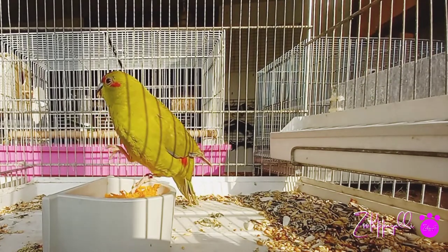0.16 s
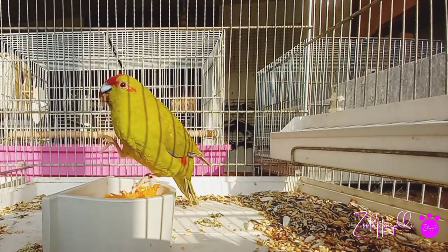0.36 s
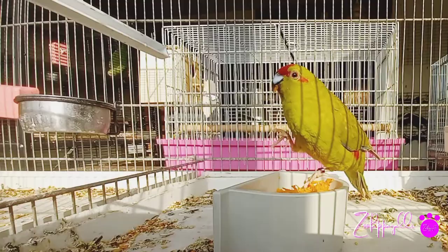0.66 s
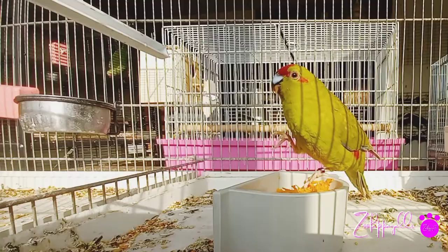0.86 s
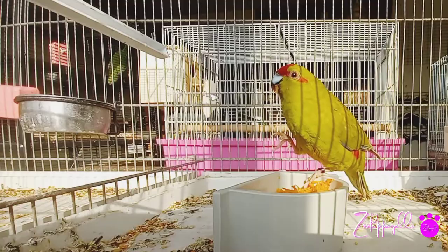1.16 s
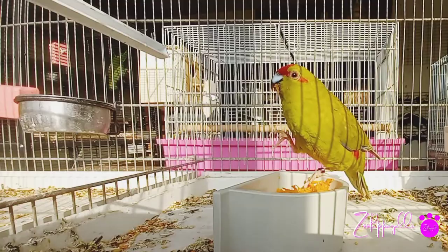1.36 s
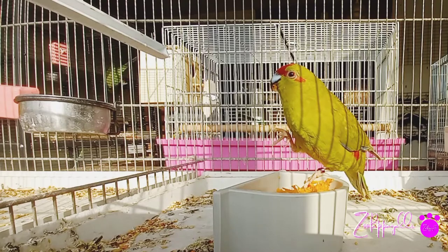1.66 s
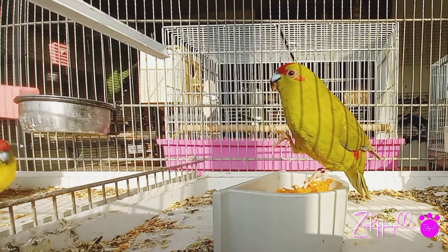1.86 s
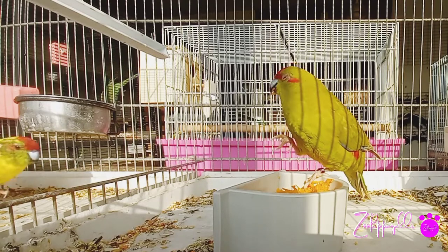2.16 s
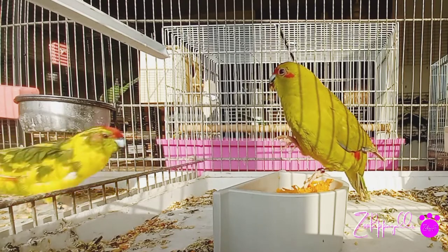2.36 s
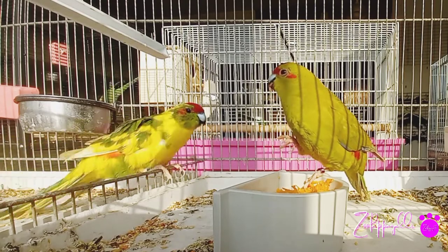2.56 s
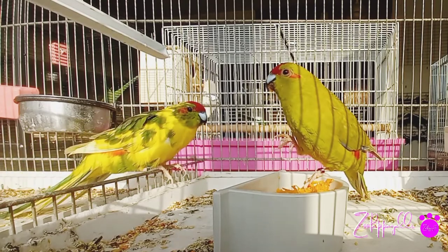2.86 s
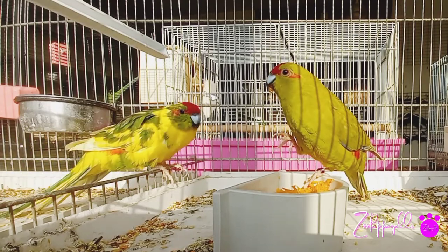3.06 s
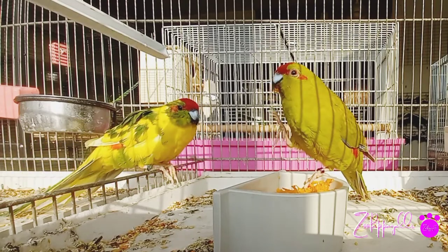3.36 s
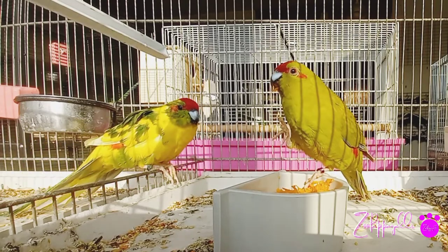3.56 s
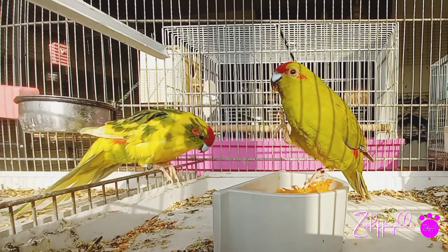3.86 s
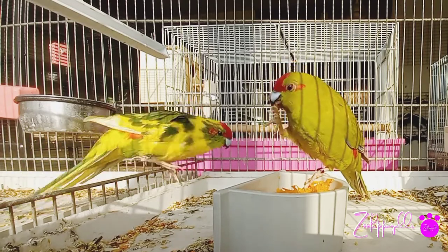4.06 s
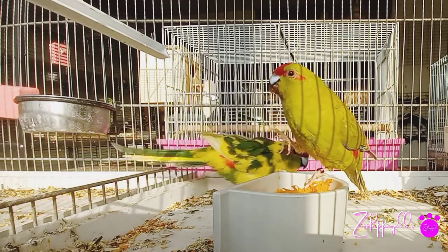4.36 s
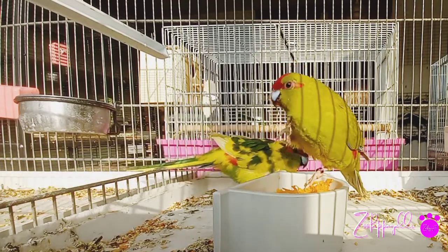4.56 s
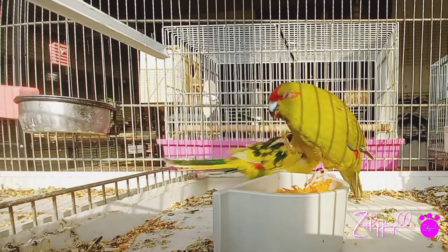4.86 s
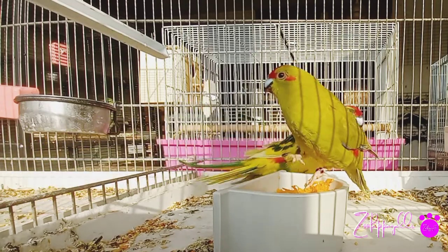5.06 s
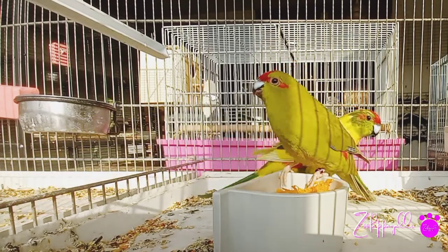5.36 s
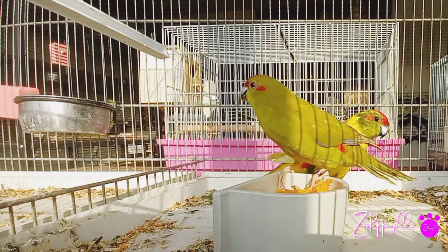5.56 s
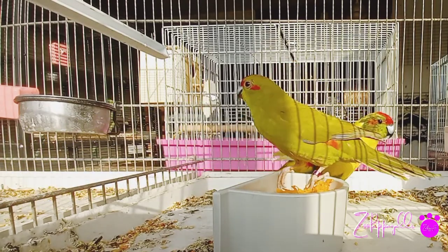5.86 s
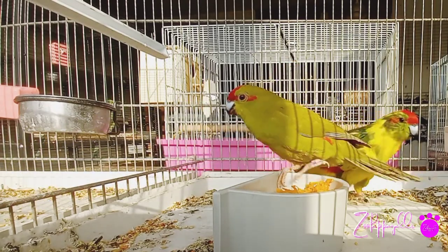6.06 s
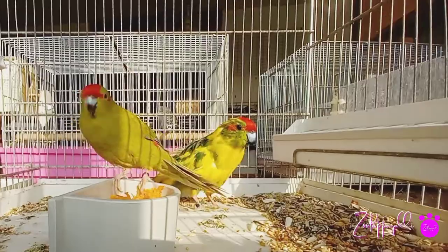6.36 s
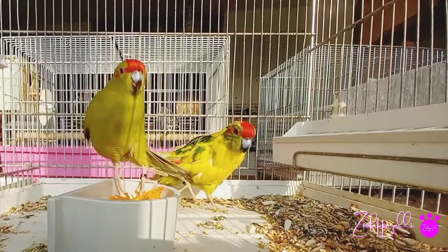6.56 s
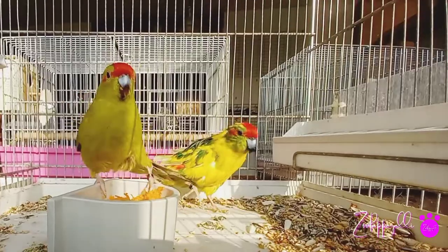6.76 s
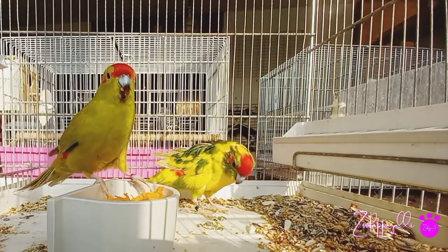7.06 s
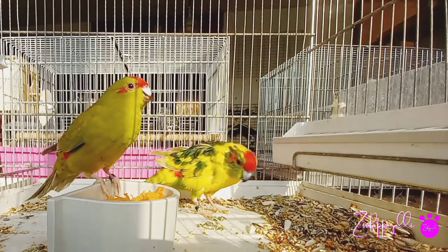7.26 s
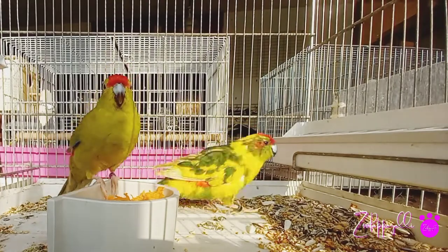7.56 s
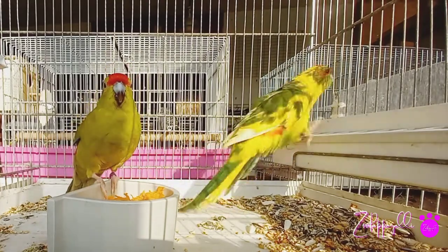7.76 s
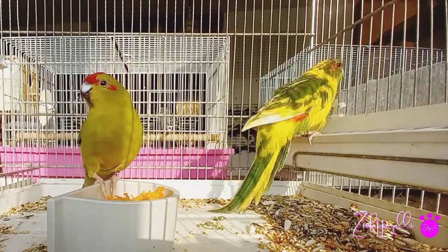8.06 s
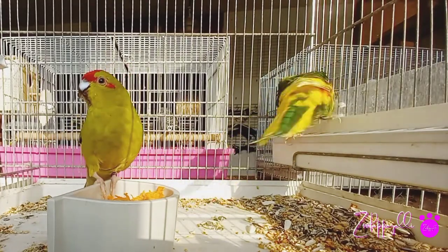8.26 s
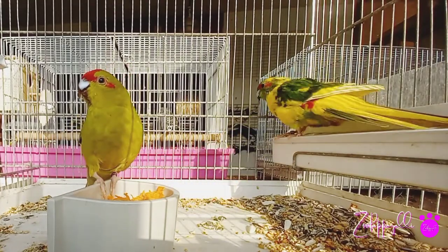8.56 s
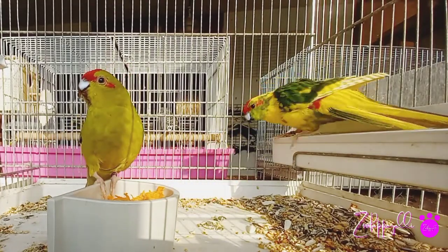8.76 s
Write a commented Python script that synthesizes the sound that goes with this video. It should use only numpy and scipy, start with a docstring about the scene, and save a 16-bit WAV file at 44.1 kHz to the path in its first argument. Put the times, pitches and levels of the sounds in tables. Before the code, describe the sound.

Two small parakeets feed in a wire cage, close by in a small, hard room with faint air noise and a low rumble. Other birds rasp and mutter faintly further off at first. From about 1.5 to 2.5 seconds, beaks and claws click on seed and wire, the plastic dish knocks, and there is a soft nasal call. Just after 3 seconds one bird whistles two quick, high, rising chirps. A short rasp at 4 seconds is followed by sharp knocks on the dish. Single pecks and steps continue until 7 seconds, with light rustles of feathers and husks and an occasional soft boom from the floor tray. Around 7.5 seconds another nasal call leads into the loudest flurry of clicks and a low thump. Quick taps on perch and wire follow just after 8 seconds, thinning to light ticks by 9.

```python
"""Parakeets at a food dish.

Two small birds feed in a wire cage, close to a stereo microphone in a small hard room. Beaks and claws
click on dish, seed and wire; the plastic dish knocks, the floor tray booms, feathers and husks rustle.
One bird whistles two rising chirps and soft nasal calls go with the hops. Other birds rasp and mutter
further off, over room air, a low rumble and a faint passing hum."""
import sys
import numpy as np
from scipy import signal
from scipy.fft import rfft, irfft
from scipy.io import wavfile
from scipy.ndimage import uniform_filter1d

SR = 44100
rng = np.random.default_rng(int(sys.argv[2]) if len(sys.argv) > 2 else 0)


def to_wav(s):
    """Save 16-bit WAV."""
    ch = np.atleast_2d(s).T  # columns
    pcm = np.round(np.clip(ch, -1, 1) * 32767)  # PCM
    wavfile.write(sys.argv[1], SR, pcm.astype(np.int16))


N = 392490

# Lone beak and claw clicks: (time [s], level [dB], body [dB], edge [dB])
CLICKS = [(0.941, -61.5, 14, 13), (0.986, -45.5, -31, 6), (1.022, -46.5, -17, -3), (1.232, -48, -22, -12),
          (1.647, -32.5, -21, 3.5), (1.823, -44.5, 15, 9), (2.168, -27, -9, -10), (2.176, -26, -1, -2),
          (2.288, -29.5, 2, -9), (2.345, -31.5, -6, -6), (2.374, -39.5, 0.5, -12), (2.4307, -29, -32, 4.5),
          (2.536, -41.5, -9, -9), (4.632, -24.5, -8.5, -10), (5.2437, -26.5, -8.5, -33),
          (5.332, -32, -14.5, -24.5), (6.359, -31.5, -11.5, -6), (6.579, -42.5, -2.5, -1),
          (6.665, -51, 5.5, -1), (6.699, -41.5, -15, -15), (7.1062, -33.5, -23.5, 8),
          (7.300, -49.5, -16.5, -17), (7.4399, -27, -20.5, 7.5), (7.485, -31, -8, -2),
          (7.517, -28.5, 2, -14.5), (7.626, -28, -5, -3), (7.6405, -29, -1.5, 9), (7.705, -27.5, -3.5, 5.5),
          (7.71, -30.5, 8.5, -4), (7.7258, -10.5, -7, 0.5), (7.7293, -16, -6.5, -7),
          (7.7519, -15.5, -15.5, -26), (7.868, -37, 8, -0.5), (8.1576, -35, -20, 1), (8.286, -46.5, 3, -3),
          (8.6075, -41.5, -3, 2), (8.689, -38, -8, -1), (8.768, -41.5, -28, -4), (8.8304, -35, -21, 2)]
# Pecks and footfalls that touch, land, then knock the dish:
# (time [s], touch [dB], gap to landing [ms], landing [dB], edge [dB], knock [dB], knock pitch [Hz])
BLOWS = [(1.7902, -27, 3.53, -24, -6, -11, 1227), (2.2978, -24, 3.1, -22.5, -9.5, -29.5, 512),
         (4.146, -28, 8.8, -23.5, -6.5, -14.5, 1178), (4.1845, -14.5, 5.5, -16.5, -10, -13.5, 720),
         (4.8051, -22, 7.9, -20.5, -5.5, -33.5, 740), (5.416, -22.5, 6.1, -19.5, -2, -28.5, 680),
         (5.9591, -20, 3.9, -39, -6.5, -23, 692), (6.123, -33.5, 11.6, -23, -4, -29.5, 740),
         (6.971, -27, 10.2, -33, -7.5, -32, 740)]
def clicks(touch_body_db=-6, landing_body_db=-11, max_ring_s=.0204, ring_halving_db=27.5):
    """Each contact is a chattering crack plus modes in three registers: dish wall, husk, claw tip."""
    contacts = list(CLICKS)
    for s, touch_db, gap_ms, landing_db, edge_db, _, _ in BLOWS:
        contacts.append((s, touch_db, touch_body_db, edge_db))
        contacts.append((s + gap_ms / 1000, landing_db, landing_body_db, edge_db))
    out, t = np.zeros((2, N)), np.arange(int(SR * .06)) / SR
    attack = 1 - np.exp(-t / .0005)
    for s, db, body_db, edge_db in contacts:
        ring_s = max_ring_s * 2 ** (min(body_db, 0) / ring_halving_db)
        fade = 1000. ** (-t / ring_s) * undb(3.5 * walk(len(t), 1200))
        registers = (540, 2000, body_db - 4), (2134, 7200, -3), (7300, 16500, edge_db - 2.5)
        click = 0
        for lo_hz, hi_hz, gain_db in registers:
            crack = 2.27 * unit(band(spread(len(t), 1) * fade, lo_hz, hi_hz))
            click = click + undb(gain_db) * unit(attack * (crack + modes(t, lo_hz, hi_hz, ring_s)))
        add(out, s, place(click * undb(db) / np.sqrt(12), s))
    return out


# Taps on tray, perch and wires: (time [s], level [dB], pitch [Hz], ring [ms])
KNOCKS = [(1.803, -34.5, 506, 37), (4.195, -23.5, 533, 25), (6.567, -44.5, 1290, 34), (6.79, -54, 1306, 42),
          (6.969, -39, 1194, 11), (7.107, -39.5, 1243, 15), (7.441, -38.5, 1247, 14),
          (7.654, -33.5, 896, 26), (7.867, -37, 823, 9.4), (8.1285, -25, 1255, 5), (8.156, -30, 5470, 13),
          (8.185, -22.5, 1550, 4.5), (8.192, -19.5, 1640, 3.1), (8.208, -26, 1560, 3.8),
          (8.2855, -39, 5170, 15), (8.609, -36, 5170, 13), (8.609, -56.5, 2010, 49), (8.676, -50, 1940, 23),
          (8.831, -56, 1920, 38)]
def knocks(wall_lag_ms=4.5, wall_ring_ms=11.2):
    """A soft push of foot or beak rings one heavily damped mode and two weaker ones."""
    dish_knocks = [(s + (gap_ms + wall_lag_ms) / 1000, db, hz, wall_ring_ms)
                   for s, _, gap_ms, _, _, db, hz in BLOWS]
    out, t = np.zeros((2, N)), np.arange(SR // 8) / SR
    for s, db, hz, ring_ms in list(KNOCKS) + dish_knocks:
        age = t * 1000 / ring_ms
        envelope = 1000. ** -age * (1 - np.exp(-age / .099)) ** 2
        phase = 2 * np.pi * hz * t
        tone = np.sin(phase) + .12 * np.sin(1.9 * phase) + .2 * np.sin(.87 * phase)
        add(out, s, place(tone * envelope / envelope.max() * undb(db + 3.5), s))
    return out


# Tray and wire resonances: (centre [Hz], T60 [s], level [dB])
CAGE_MODES = [(491, 0.33, -14), (573, 0.036, -14.5), (1235, 0.29, -14), (1296, 0.23, -13),
              (2270, 0.15, -9.5), (2630, 0.6, -16)]
def cage(x, gain_db=0):
    """Contacts pass into the tray and wires, which rattle on in narrow bands."""
    t = np.arange(SR // 2) / SR
    response = 0
    for hz, t60_s, db in CAGE_MODES:
        ring = band(rng.standard_normal(len(t)), .91 * hz, 1.09 * hz, order=2) * 1000. ** (-t / t60_s)
        response = response + undb(db + gain_db) * ring / np.sqrt(np.sum(ring ** 2) * 10)
    return x + signal.fftconvolve(x, response[None], axes=1)[:, :N]


# Rising chirps: (time [s], stretch [ratio], level [dB])
CHIRPS = [(3.074, 1.0, -24.5), (3.266, .93, -24.5)]
def chirps(base_s=.09, sweep_hz=(4950, 7200), swell_db=9.5, pan_db=-2.5):
    """The near bird's whistle rises evenly and swells, rougher and buzzier as it climbs."""
    out = np.zeros((2, N))
    for s, stretch, db in CHIRPS:
        n = int(base_s * stretch * SR)
        t = np.arange(n) / SR / stretch
        progress = t / base_s
        hz = np.interp(progress, [0, 1], sweep_hz)
        ramp = np.minimum(t / .04, (base_s - t) / .0074)
        level_db = db + swell_db * (np.minimum(ramp, 1) - 1)
        tone = whistle(hz, rough=.03 * np.sqrt(progress), octave_db=-14.5,
                       buzz_db=-28.5 + 15 * progress, buzz_hz=2633, hiss_db=-22)
        envelope = signal.windows.tukey(n, .2) * undb(level_db + 1.9 * walk(n, 320))
        add(out, s, place(tone * envelope, s))
    return out * undb(np.array([[pan_db], [-pan_db]]) / 2)


# Feathers and feet over husks: (peak time [s], length [s], level [dB], body [dB], edge [dB])
RUSTLES = [(1.49, .2, -54, -10.5, -11.5), (1.60, 0.13, -49, -8, -9.5), (1.831, 0.073, -44, 10, -15.5),
           (2.343, 0.068, -44.5, 1, -9), (2.46, 0.068, -49.5, 0.5, -11.5), (3.683, 0.14, -57.5, -11, -16),
           (3.861, 0.16, -59.5, -19, -10), (4.446, 0.12, -54.5, -7, -28), (4.617, 0.024, -37.5, -6, -16),
           (4.852, 0.12, -51, 2.5, -16), (5.134, .18, -61, 3.5, -24), (5.333, 0.036, -45.5, 0.5, -12),
           (5.631, 0.07, -65.5, -5, -10), (5.865, 0.059, -57.5, -3.5, -23), (5.929, 0.041, -44, -3.5, -16),
           (6.376, 0.044, -48.5, 5.5, -12), (6.79, .11, -64, 0, -2.5), (7.377, 0.027, -55.5, -3, -20),
           (7.524, 0.096, -46.5, 6, -9), (7.623, 0.039, -37, 5.5, -8), (7.77, .06, -52.5, 14, -18),
           (8.167, .032, -43, -9.5, -14), (8.695, 0.17, -67.5, -4, -6)]
def rustles(rise_share=.36, base_hz=4520, body_db_per_octave=69, width_hz=1000):
    """Dense husk and barb ticks swell and die, ringing in three bands about an octave apart."""
    out = np.zeros((2, N))
    for s, length_s, db, body_db, edge_db in RUSTLES:
        rise_s, fall_s = length_s * rise_share, length_s * (1 - rise_share)
        hz = base_hz * 2 ** (-body_db / body_db_per_octave)
        t = np.arange(-min(2 * rise_s, s), 2.7 * fall_s, 1 / SR)
        swell = np.exp(-(t / np.where(t < 0, rise_s, fall_s)) ** 2)
        ticks = spread(len(t), 4.1) * undb(2 * walk(len(t), 1400) + 3.6 * walk(len(t), 90))
        registers = (490, 2380, body_db), (2760, 7800, 5), (7300, 17800, edge_db + 15)
        brush = sum(undb(gain_db) * unit(band(ticks, lo, hi)) for lo, hi, gain_db in registers)
        for ratio, gain_db in (.54, -23), (1, -4.5), (2, edge_db - 4):
            ring = resonance(ticks, ratio * hz, ratio * width_hz)
            ring = resonance(ring, ratio * hz, 2 * ratio * width_hz)
            brush = brush + undb(gain_db) * unit(ring)
        add(out, s + t[0], place(brush * swell * undb(db), s))
    return out


# Landings and steps on the tray: (time [s], level [dB])
BOOMS = [(1.83, -37.5), (6.381, -38), (6.429, -44.5), (7.733, -39)]
def booms(hz=78.8, attack_s=.0067, t60_s=.53):
    """The wide floor tray swings in its lowest mode, with one weak overtone."""
    out, t = np.zeros(N), np.arange(SR) / SR
    envelope = (1 - np.exp(-t / attack_s)) * 1000. ** (-t / t60_s)
    for s, db in BOOMS:
        tone = np.sin(2 * np.pi * hz * (t + s)) + .29 * np.sin(2 * np.pi * 1.7 * hz * t)
        add(out, s, 2.8 * undb(db) * tone * envelope)
    return out


# Soft calls close by: (time [s], length [s], held pitch [Hz], level [dB])
NEAR_CALLS = [(2.219, 0.092, 542, -37), (7.567, .12, 519, -36)]
def near_calls(arch_at_s=.07, arch_width_s=.024, arch_hz=630):
    """Nasal notes hold, then arch up and back; the overtones fade as the pitch climbs."""
    out = np.zeros((2, N))
    for s, length_s, hz, db in NEAR_CALLS:
        t = np.arange(0, length_s, 1 / SR)
        arch = np.exp(-((t - arch_at_s) / arch_width_s) ** 2)
        note = nasal(hz + arch_hz * arch, overtones_db=-3.5 - 17.5 * arch, upper_db=-3.5, rough=.012)
        add(out, s, place(undb(db) * note, s))
    return out


# Birds across the room: (time [s], length [s], level [dB], pitch [Hz])
RASPS = [(0, 0.23, -58, 5000), (1.287, 0.11, -59.5, 5250), (2.043, 0.21, -49.5, 5930),
         (2.919, 0.12, -65, 3060), (3.823, 0.061, -54, 5700), (4.009, 0.036, -37.5, 5665),
         (8.317, .05, -61.5, 5250)]
def rasps(fade_db=6):
    """Thin, very rough whistles on a held pitch start at once and fade."""
    out = np.zeros((2, N))
    for s, length_s, db, hz in RASPS:
        n = int(length_s * SR)
        tone = whistle(np.full(n, hz), rough=.055, octave_db=-6.5, buzz_db=-14, buzz_hz=3150, hiss_db=-7)
        level_db = db - np.linspace(0, fade_db, n) + 1.7 * walk(n, 300)
        add(out, s, place(tone * signal.windows.tukey(n, .05) * undb(level_db), s))
    return out


# Distant answers: (time [s], length [s], start pitch [Hz], end pitch [Hz], level [dB], overtones [dB])
FAR_CALLS = [(0.827, 0.083, 847, 1071, -62.5, -1), (1.068, 0.048, 695, 683, -53.5, -6),
             (8.299, .06, 1019, 663, -54.5, -14)]
def far_calls():
    """Short hoarse notes glide evenly."""
    out = np.zeros((2, N))
    for s, length_s, start_hz, end_hz, db, overtones_db in FAR_CALLS:
        hz = np.linspace(start_hz, end_hz, int(length_s * SR))
        add(out, s, place(undb(db) * nasal(hz, overtones_db, upper_db=-11, rough=.065), s))
    return out


def husks(rate_per_s=5):
    """Seed husks drop and crack at random: faint dry ticks, a few louder than the rest."""
    out, t = np.zeros((2, N)), np.arange(SR // 80) / SR
    for when, smallness, pitch in rng.random((int(rate_per_s * N / SR), 3)):
        s, hz = when * N / SR, 3500 + 6500 * pitch
        db = -75 - 10 * np.log(smallness + .093)
        add(out, s, place(modes(t, .6 * hz, 1.4 * hz, ring_s=.018) * undb(db), s))
    return out


def hum(middle_s=5.29, length_s=.6):
    """Two faint, low, wavering tones fade in and out once."""
    out, n = np.zeros(N), int(length_s * SR)
    tones = sum(undb(db + 2 * walk(n, 25)) * np.sin(wavering_phase(np.full(n, hz), .019, 41))
                for hz, db in ((250, -57), (375, -52)))
    add(out, middle_s - length_s / 2, tones * signal.windows.tukey(n, .5))
    return out


# Room air spectrum: (frequency [Hz], gain [dB])
AIR_SPECTRUM = [(15, -60.5), (25, -27.5), (56, -3), (82, 3.5), (111, -3.5), (130, -17.5), (161, -6.5),
                (180, -47.5), (229, -20.5), (317, -28.5), (354, -22), (489, -41), (7920, -56),
                (11600, -52.5), (16000, -52.5)]
# Rumble envelope: (time [s], level [dB])
RUMBLE_LEVELS = [(0.0, -61.5), (0.69, -74.5), (1.46, -67), (1.68, -61), (2.13, -66.5), (2.4, -57),
                 (2.68, -71), (3.1, -67), (3.3, -61.5), (4.21, -63), (4.46, -74.5), (5.08, -65.5),
                 (5.28, -57), (5.67, -70.5), (7.44, -71), (7.66, -50), (7.86, -69.5), (8.9, -73)]
def background(air_db=-51):
    """Still room air with a low drone, and a rumble that slowly swells and sinks."""
    common = colour(rng.standard_normal(N), [(500, -8), (3000, -7.5)])
    sides = colour(rng.standard_normal((2, N)), [(400, -6.5), (2000, 4)])
    air = unit(colour(common + sides, AIR_SPECTRUM))
    rumble = unit(colour(spread(N, .66), [(60, -33.5), (150, 3), (200, 1), (250, .5), (320, -.5),
                                          (400, -5.5), (470, -7), (1000, -20.5), (4000, -46)]))
    rumble_db = np.interp(np.arange(N) / SR, *np.transpose(RUMBLE_LEVELS)) + 7 + 1.5 * walk(N, 7.4)
    return air * undb(air_db + .55 * walk(N, 7.5)) + rumble * undb(rumble_db)


# Room decay: (frequency [Hz], T60 [s])
ROOM_T60 = [(100, 0.45), (500, 0.31), (1300, 0.38), (3000, 0.6), (6300, 0.49), (10000, 0.73), (16000, 0.19)]
def room(x, early_db=6, early_s=.0051):
    """Cage and tray scatter the sound at once; the walls add a half-second tail."""
    n = int(.7 * SR)
    t, f = np.arange(n) / SR, np.arange(n // 2 + 1) * SR / n
    noise = rng.standard_normal((2, n))
    scatter_db = 7.8 * rng.standard_normal((2, n)) * np.exp(-t / .12)
    spectrum = rfft(noise * undb(scatter_db))
    edges_hz = np.geomspace(60, 17000, num=10)
    tail = 0
    for lo, hi in zip(edges_hz, edges_hz[1:]):
        t60_s = np.interp(np.sqrt(lo * hi), *np.transpose(ROOM_T60))
        tail = tail + irfft(spectrum * ((f >= lo) & (f < hi)), n) * 1000. ** (-t / t60_s)
    tail = colour(tail, [(400, 4.5), (2500, .012), (6500, .0094), (11000, -2.5)])
    onset = np.clip((t - .002) / .0086, 0, 1)
    tail *= onset * (1 + undb(early_db) * np.exp(-t / early_s))
    tail /= np.sqrt(np.sum(tail ** 2, axis=1, keepdims=True))
    return signal.fftconvolve(x, tail, axes=1)[:, :N]


# Path of the busy bird: (time [s], left lag [samples], left minus right [dB])
BIRD_PATH = [(0, -17.5, 0), (2.5, -15.5, 1.5), (4.18, -11, -1.5), (4.8, 1, 0), (7, 7, -3.5),
             (7.7, 13, -1.5), (8.199, 15, -5)]
def place(x, s):
    """Two spaced microphones hear a sound at different moments and levels."""
    times_s, lags, pans_db = np.transpose(BIRD_PATH)
    lag, pan_db = int(np.interp(s, times_s, lags)), np.interp(s, times_s, pans_db)
    left, right = np.broadcast_to(x, (2, x.shape[-1]))
    padding = max(lag, 0), max(-lag, 0)
    return np.array([np.pad(left, padding) * undb(pan_db / 2),
                     np.pad(right, padding[::-1]) * undb(-pan_db / 2)])


def modes(t, lo_hz, hi_hz, ring_s, count=7):
    """Short modes, soon damped by plastic and husk; each contact point rings a different set."""
    pitch, life, size = rng.random((3, count, 1))
    hz = lo_hz + (hi_hz - lo_hz) * pitch
    t60_s = min(ring_s, .018) * (.6 + .8 * life)
    return unit(np.sum((.11 + size) * np.sin(2 * np.pi * hz * t) * 1000. ** (-t / t60_s), axis=0))


def whistle(hz, rough, octave_db, buzz_db, buzz_hz, hiss_db):
    """A hoarse whistle with a faint octave, hiss and a narrow band of buzz."""
    phase = wavering_phase(hz, rough, 1400)
    noise = rng.standard_normal(len(hz))
    octave = undb(octave_db) * np.sin(2 * phase + .55 * walk(len(hz), 2000))
    hiss = undb(hiss_db) * unit(band(noise, 2500, 9800))
    buzz = undb(buzz_db) * unit(band(noise, buzz_hz - 220, buzz_hz + 220))
    return np.sqrt(2) * (np.sin(phase) + octave + hiss + buzz)


def nasal(hz, overtones_db, upper_db, rough):
    """A soft note of four harmonics on a wavering pitch."""
    phase = wavering_phase(hz, rough, 400)
    upper = undb(upper_db) * (np.sin(3 * phase) + .13 * np.sin(4 * phase))
    tone = np.sin(phase) + undb(overtones_db) * (np.sin(2 * phase) + upper)
    return np.sqrt(2) * tone * signal.windows.tukey(len(hz), .2)


def wavering_phase(hz, depth, rate_hz):
    """Phase of a tone whose pitch wanders around hz."""
    return 2 * np.pi * np.cumsum(hz * (1 + depth * walk(len(hz), rate_hz))) / SR


def walk(n, rate_hz):
    """Smooth random motion with a spread near 1."""
    step = max(int(SR / rate_hz), 1)
    return 1.4 * uniform_filter1d(np.repeat(rng.standard_normal(n // step + 1), step), step)[:n]


def spread(n, apart):
    """Stereo noise: a common part plus each side's own."""
    return rng.standard_normal(n) + apart * rng.standard_normal((2, n))


def band(x, lo_hz, hi_hz, order=3):
    """Causal band-pass."""
    sos = signal.butter(order, [lo_hz, min(hi_hz, .48 * SR)], "band", fs=SR, output="sos")
    return signal.sosfilt(sos, x)


def resonance(x, hz, width_hz):
    """One resonance, gain 1 at its centre."""
    return signal.lfilter(*signal.iirpeak(min(hz, .45 * SR), hz / width_hz, fs=SR), x)


def colour(x, points):
    """Equalise by (frequency [Hz], gain [dB]) points."""
    hz, db = np.transpose(points)
    n = x.shape[-1]
    f = np.arange(n // 2 + 1) * SR / n
    return irfft(rfft(x) * undb(np.interp(np.log(f + 1), np.log(hz), db)), n)


def undb(db):
    """Decibels to gain."""
    return 10 ** (np.asarray(db) / 20)


def unit(x):
    """Scale to rms 1."""
    return x / np.sqrt(np.mean(x ** 2))


def add(out, s, x):
    """Mix x into out from time s on."""
    i = max(int(s * SR), 0)
    out[..., i:i + x.shape[-1]] += x[..., :N - i]


def scene():
    """Contacts and calls arrive directly and through the room; booms, hum and background stay dry."""
    # (sound, direct [dB], room [dB])
    sources = [(cage(clicks() + husks()), 0, -10.5),
               (cage(knocks(), gain_db=-3), 0, -21),
               (rustles(), -2, -8),
               (chirps(), -4, 0),
               (rasps(), -4, -.5),
               (near_calls(), 0, -14.5),
               (far_calls(), -5, 0)]
    direct = sum(x * undb(direct_db) for x, direct_db, _ in sources)
    reverb = room(sum(x * undb(room_db) for x, _, room_db in sources))
    return direct + reverb + booms() + hum() + background()


# Treble peak near 6.5 kHz, dip near 7.5-8.6 kHz, thinned bass: (frequency [Hz], gain [dB])
TREBLE_COLOUR = [(30, -17), (1500, 1.5), (2200, -0.5), (3700, -2.5), (5000, 0.5), (6500, 4.5), (7050, -0.5),
                 (7500, -10), (8600, -4.5), (10000, 0.5), (12500, 2.5), (16000, -4)]
def record(dry, ceiling=.8, top_hz=16200):
    """A fixed treble colour; peaks over the ceiling clip, and the top is cut."""
    clipped = np.clip(colour(dry, TREBLE_COLOUR), -ceiling, ceiling)
    return signal.sosfilt(signal.ellip(10, .2, 70, top_hz, fs=SR, output="sos"), clipped)


dry = scene()
out = record(dry)
to_wav(out)
```